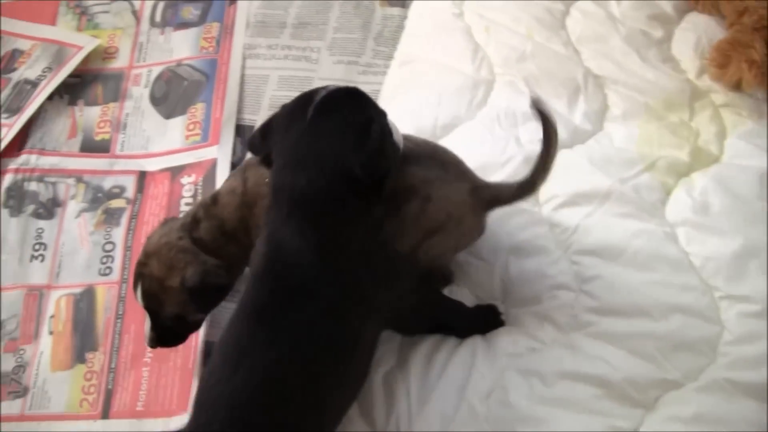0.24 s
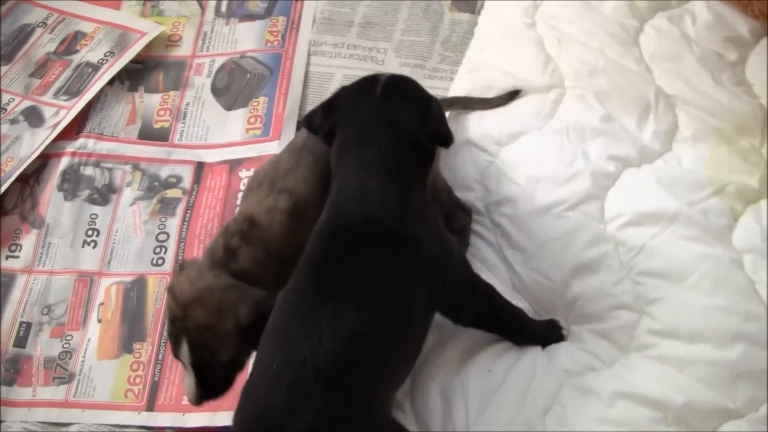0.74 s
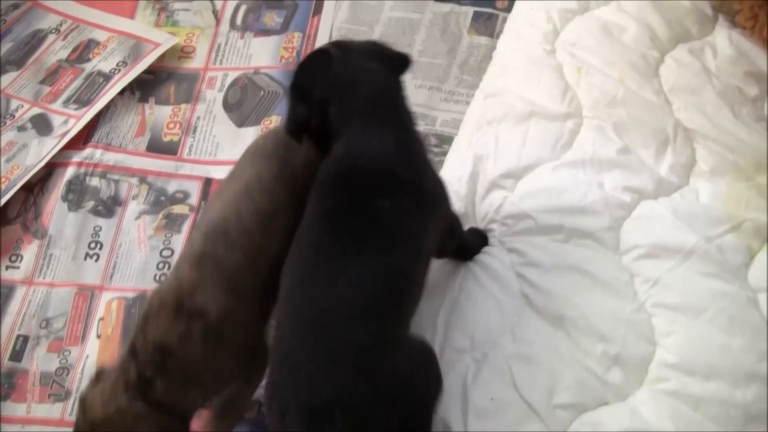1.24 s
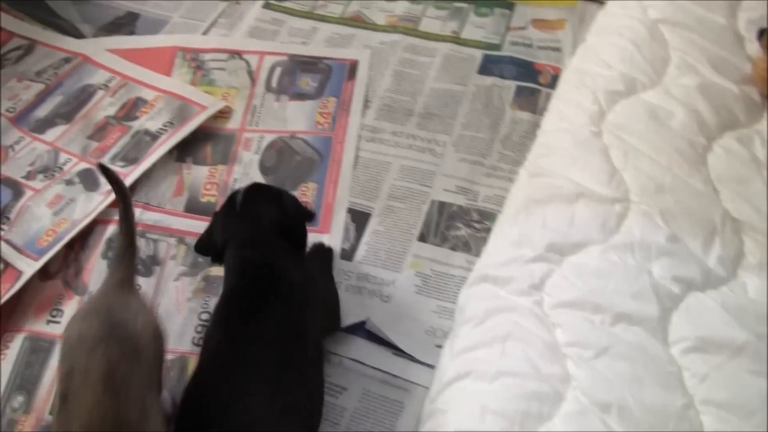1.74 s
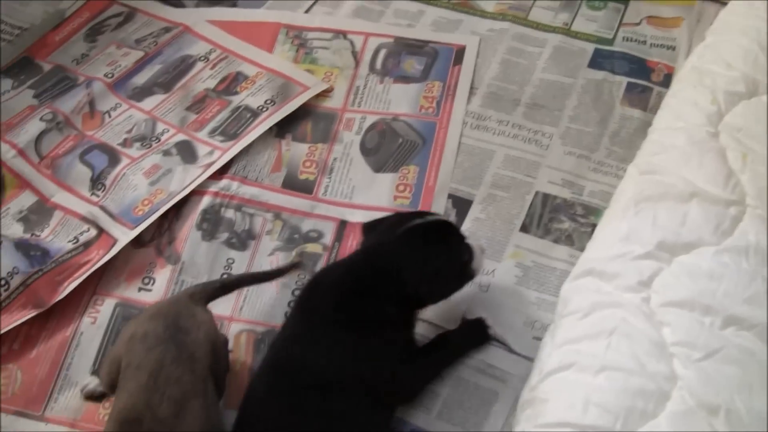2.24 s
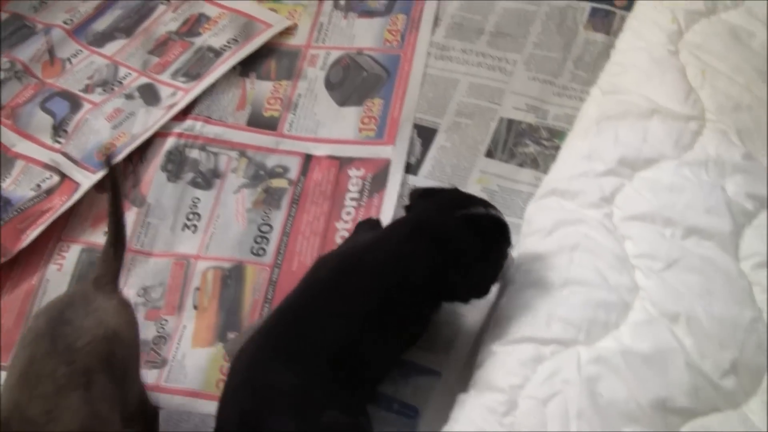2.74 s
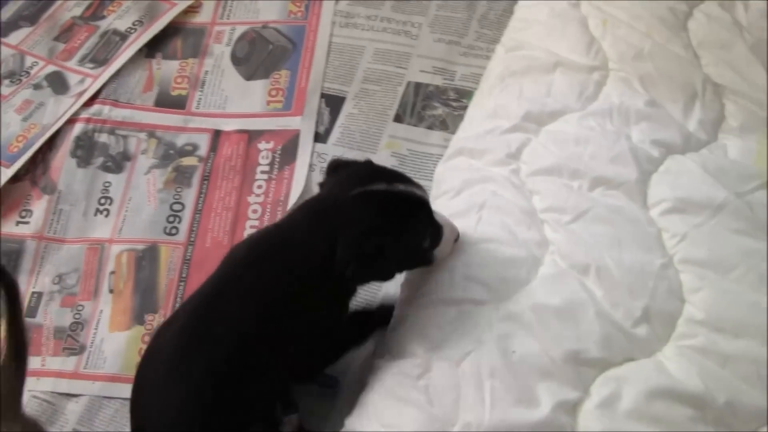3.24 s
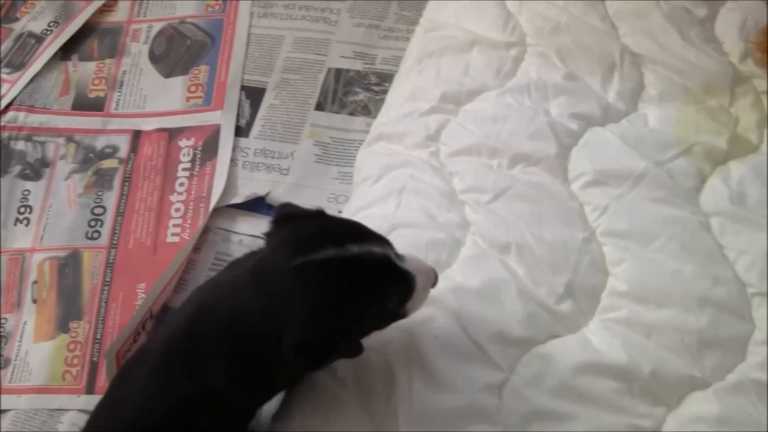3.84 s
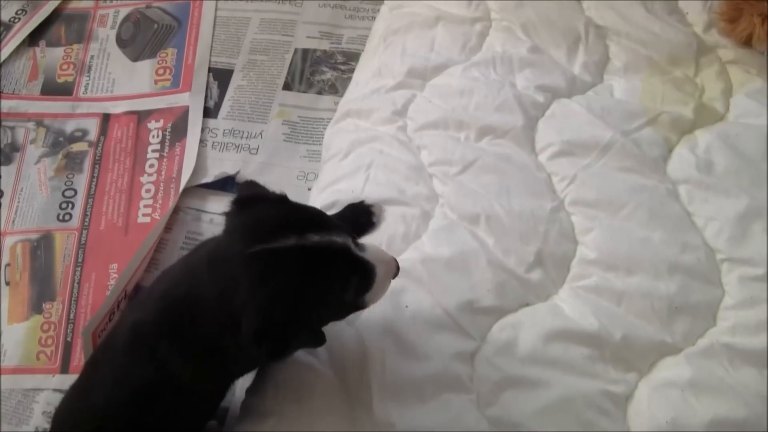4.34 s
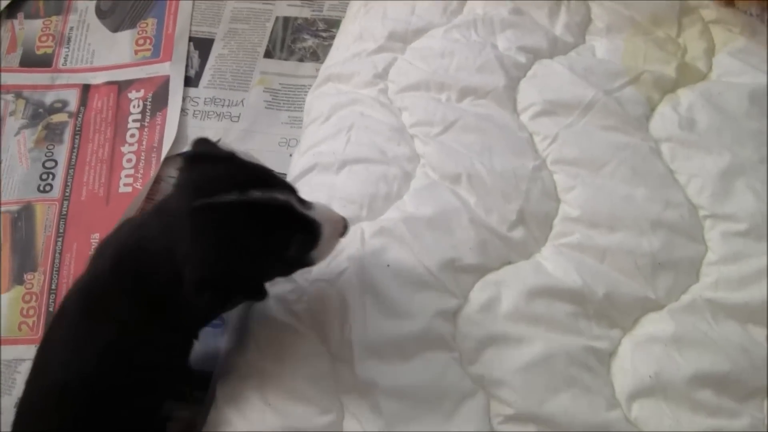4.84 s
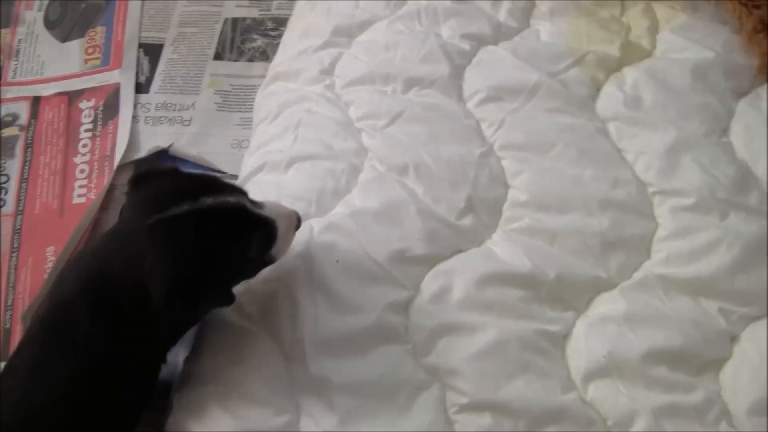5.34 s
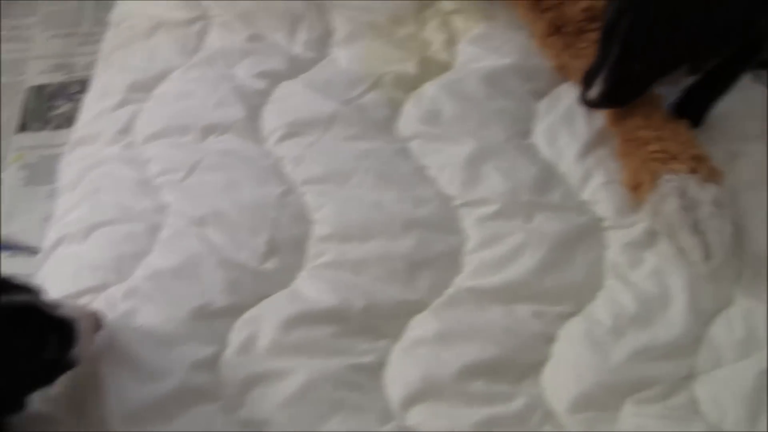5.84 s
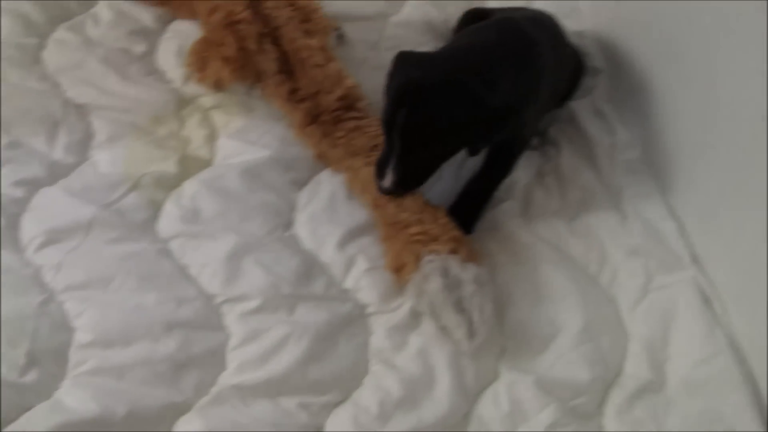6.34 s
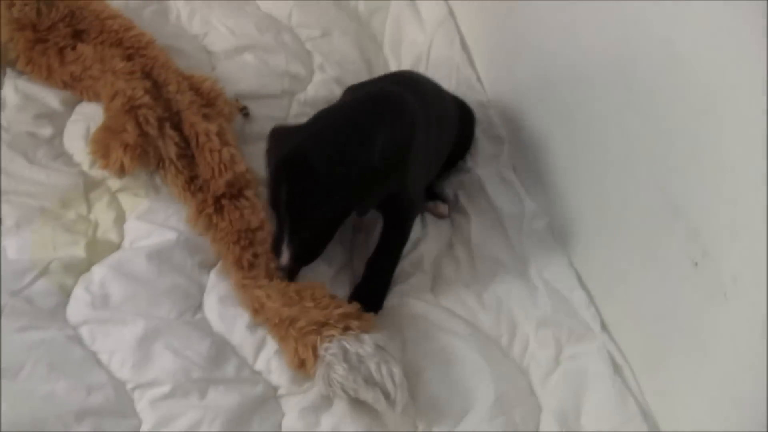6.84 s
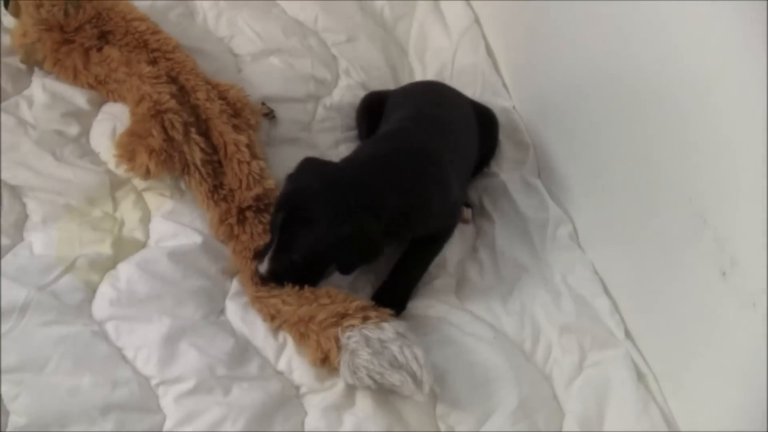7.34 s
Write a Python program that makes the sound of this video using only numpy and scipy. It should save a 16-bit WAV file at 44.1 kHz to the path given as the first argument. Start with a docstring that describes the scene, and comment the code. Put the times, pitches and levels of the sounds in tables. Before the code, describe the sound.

Puppies scuffle on spread newspaper and a duvet in a small room. Paper crinkles and cloth rustles in uneven bursts, with sharp little claw ticks. Early on, the scuffle swells into loud crackling and a cluster of soft thuds on bedding and floorboards, then settles into lighter shuffling, scattered creases and occasional bumps. A microphone about a metre above picks it up with faint hiss.

```python
"""Puppies scuffling on newspaper

Paws drag spread sheets and a duvet (dense crackle), creases buckle in short bursts, claws tick
and bodies thud on bedding and floorboards. Under it lie one faint hum, the short tail of a
small room and the hiss of a microphone pair a metre above."""
import sys
import numpy as np
from scipy import signal
from scipy.fft import rfft, irfft, next_fast_len
from scipy.io import wavfile
from scipy.ndimage import uniform_filter1d

SR = 44100
rng = np.random.default_rng(int(sys.argv[2]) if len(sys.argv) > 2 else 0)


def unload_wav(signal):
    """Save mono or channel-first audio to the path in sys.argv[1] as 16-bit WAV at rate SR, clipped to [-1, 1]."""
    wavfile.write(
        sys.argv[1],
        SR,
        np.round(np.clip(np.atleast_2d(signal).T, -1, 1) * 32767).astype(np.int16),
    )


N = 334719


def undb(db):
    return 10 ** (np.asarray(db) / 20)


def unit(x):
    return x / np.sqrt(np.mean(x ** 2))


def add(out, start_s, sound):
    i = int(start_s * SR)
    out[..., i:i + sound.shape[-1]] += sound[..., :N - i]


def colour(x, points):
    """Shape a spectrum by (frequency [Hz], gain [dB]) points."""
    hz, db = np.transpose(points)
    size = next_fast_len(x.shape[-1])
    bins_hz = np.arange(size // 2 + 1) * SR / size + 1
    gain = undb(np.interp(np.log(bins_hz), np.log(hz), db))
    return irfft(rfft(x, size) * gain, size)[..., :x.shape[-1]]


def noise(count, spectrum):
    """Coloured noise, RMS 1."""
    return unit(colour(rng.standard_normal(count), spectrum))


def ring(x, hz, width_hz):
    """One resonance, gain 1 at its centre."""
    return signal.lfilter(*signal.iirpeak(min(hz, .4 * SR), hz / width_hz, fs=SR), x)


def crackle(count, per_s, spread_db):
    """Random clicks of uneven size."""
    on = rng.random(count) < per_s / SR
    return unit(on * rng.standard_normal(count) * undb(spread_db * rng.exponential(size=count)))


def grains(count, grain_ms, spread_db):
    """Noise broken into grains of uneven size."""
    k = int(grain_ms * SR / 1000) + 1
    size = np.sqrt(k) * uniform_filter1d(rng.standard_normal(count), k)
    return unit(rng.standard_normal(count) * undb(spread_db * size))


def walk(rate_hz):
    """Random steps, smoothed twice; spread near 1."""
    k = int(SR / rate_hz)
    steps = np.repeat(rng.standard_normal(N // k + 1), k)
    return 1.58 * uniform_filter1d(uniform_filter1d(steps, k), k)[:N]


# Microphone noise spectra, mid and side: (frequency [Hz], gain [dB])
MID_HISS_SPECTRUM = [(24, -48), (40, 12.5), (288, 2), (475, 8), (658, 8), (1930, 2.5), (4630, -39),
                     (8640, -31.5), (10300, -23), (12600, -8), (14300, -15), (15800, -70)]
SIDE_HISS_SPECTRUM = [(24, -62), (40, -32), (261, -0.5), (380, 1), (539, -0.5), (804, -3), (1620, -11.5),
                      (4630, -23), (6090, -29), (11100, -32), (13900, -37), (15800, -71)]


def hiss(mid_db=-57.5, side_db=-45.5):
    """Steady noise of the microphone pair: (mid, side)."""
    side = undb(side_db) * noise(N, SIDE_HISS_SPECTRUM)
    mid = undb(mid_db) * noise(N, MID_HISS_SPECTRUM)
    return mid, side


def room(x, low_t60_s=0.1, split_hz=3300):
    """Small room: two unrelated tails, the treble dying first."""
    t = np.arange(int(.5 * SR)) / SR
    white = rng.standard_normal((2, len(t)))
    low = signal.lfilter(*signal.butter(1, split_hz, fs=SR), white)
    decay = -np.log(1000) * t / low_t60_s
    tail = (low * np.exp(decay) + (white - low) * np.exp(1.28 * decay)) * np.minimum(t / 0.0019, 1)
    tail /= np.sqrt(np.sum(tail ** 2, axis=1, keepdims=True))
    return signal.fftconvolve(x[None], tail, axes=1)[:, :N]


# Transfer of near sound to the side channel: (frequency [Hz], gain [dB])
SIDE_RESPONSE = [(100, -41), (500, -43), (2000, -15), (5000, -8), (9000, -4), (12000, 6), (15000, 1)]


def stereo_spread(impacts, wide_drag, decay_s=0.004):
    """Side signal: reflections and spread-out grains reach the two microphones unequally."""
    smear = rng.standard_normal(2048) * np.exp(-np.arange(2048) / SR / decay_s)
    echoes = signal.fftconvolve(impacts, smear / np.sqrt(np.sum(smear ** 2)))[:N]
    return colour(echoes + wide_drag, SIDE_RESPONSE)


def hum(start_s=7.29, end_s=7.39, hz=200, db=-49):
    """One faint, rough swell of a low tone, perhaps a grunt."""
    out, t = np.zeros(N), np.arange(int((end_s - start_s) * SR)) / SR
    rough = 1 + .3 * unit(ring(rng.standard_normal(len(t)), hz=40, width_hz=40))
    swell = np.sin(np.pi * t / (end_s - start_s))
    add(out, start_s, undb(db) * rough * swell * np.sin(2 * np.pi * hz * t))
    return out


# Bedding spectrum: (frequency [Hz], gain [dB])
BEDDING_SPECTRUM = [(35, -10), (60, -19), (96, -10.5), (150, -7), (220, 0.5), (351, 3), (476, -2),
                    (800, -0.5), (1000, -8), (1300, -9), (2200, -120)]
# Bedding movement: (time [s], level [dB])
SHUFFLE_LEVELS = [(0.0, -45.5), (0.4, -50.5), (1.35, -45.5), (1.65, -39), (1.8, -46.5), (2.15, -52),
                  (2.6, -55), (2.9, -51.5), (3.4, -51), (3.85, -49), (4.3, -50), (4.6, -51.5), (4.85, -52),
                  (5.22, -53), (5.67, -48.5), (6.15, -51.5), (6.45, -49.5), (6.75, -52), (6.98, -50),
                  (7.59, -53.5)]


def shuffle():
    """Shifting bedding: dull noise with a wavering level."""
    bedding = noise(N, BEDDING_SPECTRUM)
    level_db = np.interp(np.arange(N) / SR, *np.transpose(SHUFFLE_LEVELS))
    return bedding * undb(level_db + 1.36 * walk(rate_hz=9))


# Paws and bodies landing: (time [s], bedding level [dB], bedding ring [Hz], boards level [dB])
LANDINGS = [(0.118, -34.5, 285, -50), (0.347, -46, 263, -69), (0.653, -35.5, 301, -65),
            (0.919, -38, 343, -55), (1.515, -34, 264, -64), (1.617, -23.5, 292, -38),
            (1.802, -25.5, 275, -29.5), (1.828, -26, 198, -31.5), (1.858, -27, 345, -47),
            (1.958, -32.5, 280, -32.5), (1.99, -41, 327, -37), (2.119, -60, 290, -51),
            (3.36, -41, 207, -58), (3.624, -38, 392, -48), (3.774, -28, 213, -56),
            (3.789, -27.5, 206, -44.5), (4.161, -38, 370, -67), (4.729, -43, 290, -55),
            (4.795, -45, 377, -54), (5.445, -40.5, 390, -64), (5.982, -41, 247, -50),
            (6.538, -35.5, 420, -75), (6.761, -40.5, 245, -72), (6.978, -37, 437, -62),
            (7.004, -33.5, 292, -61)]


def thuds(bedding_t60_s=0.12, boards_hz=97, boards_t60_s=0.13):
    """A soft push rings the bedding, with a dull scatter, and the floorboards under it."""
    out, t = np.zeros(N), np.arange(SR // 4) / SR
    bedding_env = (1 - np.exp(-t / 0.00094)) * np.exp(-np.log(1000) * t / bedding_t60_s)
    boards_env = (1 - np.exp(-t / 0.0031)) * np.exp(-np.log(1000) * t / boards_t60_s)
    for time_s, bedding_db, hz, boards_db in LANDINGS:
        scatter = noise(len(t), BEDDING_SPECTRUM)
        rumble = unit(ring(ring(rng.standard_normal(len(t)), boards_hz, 45), boards_hz, 45))
        bedding = bedding_env * (0.95 * np.sin(2 * np.pi * hz * t) + 0.67 * scatter)
        boards = boards_env * (2.2 * np.sin(2 * np.pi * boards_hz * t) + 1.66 * rumble)
        add(out, time_s, undb(bedding_db) * bedding + undb(boards_db) * boards)
    return out


# Fibre crackle spectrum: (frequency [Hz], gain [dB])
FIBRE_SPECTRUM = [(2000, -4.5), (3500, 2.5), (5000, 1.5), (9000, 0), (11000, -5), (12600, -12.5),
                  (14400, -22), (15800, -52)]


def fibres(count, spread_db, split_hz=7000):
    """Fibres crackle independently in two bands: rows (coarse, fine)."""
    lowpass, highpass = signal.butter(2, split_hz, fs=SR), signal.butter(2, split_hz, "high", fs=SR)
    coarse = signal.lfilter(*lowpass, grains(count, grain_ms=2.0, spread_db=spread_db))
    fine = signal.lfilter(*highpass, grains(count, grain_ms=0.35, spread_db=spread_db))
    return colour(np.array([coarse, fine]), FIBRE_SPECTRUM)


# Rustle between slides: (body [dB], coarse [dB], fine [dB])
RESTING_DB = (-55, -61.5, -62.5)
# Paper and cloth slides:
# (peak time [s], body [dB], coarse [dB], fine [dB], swell [s/10 dB], fade [s/10 dB])
SLIDES = [(0.02, -47, -54, -52, 0.089, 0.42), (0.28, -44, -44, -40.5, 0.032, 0.06),
          (0.35, -35.5, -40.5, -57, 0.06, 0.027), (0.48, -45, -59, -61, 0.03, 0.12),
          (0.62, -42.5, -47, -51, 0.12, 0.076), (0.685, -41, -47, -49, 0.053, 0.018),
          (0.81, -47.5, -53, -56, 0.061, 0.088), (0.903, -37, -43, -44, 0.016, 0.044),
          (0.96, -43.5, -42.5, -44.5, 0.044, 0.16), (1.117, -29, -27, -42, 0.017, 0.017),
          (1.14, -38.5, -41, -46.5, 0.03, 0.06), (1.3, -41, -41.5, -40.5, 0.032, 0.051),
          (1.4, -41.5, -43, -47.5, 0.054, 0.11), (1.462, -38, -30.5, -39, 0.0054, 0.05),
          (1.485, -36, -30.5, -24.5, 0.022, 0.033), (1.519, -28, -26, -36, 0.028, 0.025),
          (1.565, -31, -29.5, -37, 0.03, 0.022), (1.625, -30.5, -36.5, -35, 0.012, 0.17),
          (1.83, -36, -42, -31.5, 0.028, 0.05), (1.875, -40, -44, -38.5, 0.05, 0.02),
          (1.99, -37, -39, -37.5, 0.14, 0.087), (2.5, -50.5, -51.5, -49, 0.41, 0.63),
          (2.76, -45, -43, -62, 0.057, 0.2), (2.85, -48, -48, -44.5, 0.27, 0.13),
          (3.276, -43, -43, -34.5, 0.12, 0.049), (3.32, -38, -43, -38.5, 0.071, 0.036),
          (3.39, -37, -38, -45, 0.025, 0.079), (3.62, -46.5, -46, -41.5, 0.21, 0.049),
          (3.78, -37.5, -42.5, -39, 0.06, 0.21), (3.85, -41, -57, -52, 0.046, 0.03),
          (4.19, -43, -63, -55, 0.068, 0.053), (4.38, -54.5, -51.5, -56, 0.074, 0.11),
          (4.52, -52, -50, -52, 0.14, 0.037), (4.7, -47, -52, -57, 0.073, 0.05),
          (4.81, -53, -53, -50, 0.042, 0.1), (4.9, -48, -50, -50, 0.05, 0.14),
          (5.1, -52, -50, -54.5, 0.048, 0.11), (5.26, -47, -52, -52, 0.057, 0.021),
          (5.42, -43.5, -57, -53, 0.047, 0.046), (5.45, -42.5, -48, -51, 0.04, 0.081),
          (5.56, -43, -60, -58, 0.036, 0.06), (5.645, -46, -48, -47, 0.09, 0.02),
          (5.86, -41.5, -47.5, -51, 0.16, 0.1), (6.03, -46, -50, -45.5, 0.11, 0.037),
          (6.18, -52.5, -56, -56.5, .15, 0.24), (6.34, -44.5, -48, -48, 0.03, 0.17),
          (6.48, -43, -56, -49, 0.016, 0.19), (6.668, -40, -39.5, -44, 0.0064, 0.051),
          (6.8, -33, -40, -46, 0.031, 0.043), (6.965, -46, -45, -47.5, 0.05, 0.046),
          (7.01, -45, -44.5, -45.5, 0.03, 0.024), (7.15, -39.5, -50, -51, 0.081, 0.046),
          (7.31, -49.5, -55, -51, 0.064, 0.19), (7.52, -39.5, -40, -38, 0.012, 0.05)]


def slide_gains():
    """Slides swell and fade over the resting rustle: gains (body, coarse, fine)."""
    t = np.arange(0, N / SR, .002)
    power = undb(RESTING_DB)[:, None] ** 2
    for peak_s, *peak_db, swell_s, fade_s in SLIDES:
        decades = np.where(t < peak_s, (peak_s - t) / swell_s, (t - peak_s) / fade_s)
        power = power + undb(peak_db)[:, None] ** 2 * 10 ** -decades
    return [np.interp(np.arange(N) / SR, t, row) for row in np.sqrt(power)]


# Midrange body of the rustle: (frequency [Hz], gain [dB])
RUSTLE_SPECTRUM = [(250, -22), (500, -4), (800, -1), (1600, 3), (2600, 1), (4000, -10), (6000, -40),
                   (11000, -70)]


def drag(jerk, gains):
    """Sheets and cloth slip in tiny grains; body and fibres share the jerks of the pull."""
    body_gain, coarse_gain, fine_gain = gains
    body = unit(colour(crackle(N, per_s=6000, spread_db=0.3), RUSTLE_SPECTRUM)) * undb(1.3 * jerk)
    coarse, fine = fibres(N, spread_db=1.5) * undb(1.72 * jerk)
    return body * body_gain + unit(coarse) * coarse_gain + unit(fine) * fine_gain


# Claws and stiff folds: (time [s], level [dB], ring [Hz])
CLAW_TICKS = [(0.3504, -15, 5800), (0.678, -27, 4240), (0.9024, -27, 4040), (1.089, -15, 4330),
              (1.392, -24, 3820), (1.703, -10, 9390), (1.9689, -22, 9020), (2.013, -21, 6380),
              (2.4942, -24, 5730), (2.646, -37, 5500), (2.707, -21, 8500), (2.7285, -21, 8800),
              (2.74, -18, 8200), (2.747, -24, 8600), (2.7615, -20, 8800), (2.814, -27, 5500),
              (2.817, -22, 6800), (2.882, -35, 5500), (2.906, -23, 7500), (2.954, -27, 5500),
              (2.977, -26, 4730), (3.6122, -21, 8160), (3.7808, -21, 6930), (4.9234, -28, 3900),
              (4.9745, -31, 5000), (5.2725, -29, 4980), (5.448, -21, 5860), (5.9274, -29, 6580),
              (6.4708, -16, 5260), (6.5906, -17.5, 6350), (6.665, -21, 6620), (7.001, -29, 7180),
              (7.511, -25, 6240)]


def ticks():
    """A claw or stiff fold clicks for a few cycles, with a short fuzz behind it."""
    out, t = np.zeros(N), np.arange(SR // 100) / SR
    fuzz_env = np.minimum(t / 0.0009, 1) * np.exp(-t / 0.0057)
    for time_s, db, hz in CLAW_TICKS:
        click = np.sin(2 * np.pi * hz * t) * np.minimum(t * hz, 1) * np.exp(-t * hz / 2.7)
        fuzz = 0.48 * ring(rng.standard_normal(len(t)), hz, 0.25 * hz) * fuzz_env
        add(out, time_s, undb(db) * (click + fuzz))
    return out


def faint_creases(count=10, min_db=-44, min_hz=1200, octaves=1.4, tear_db=-5, burst_ms=8.3, scuff_db=-7):
    """Small creases at random times, as rows like those of CREASES."""
    return [(0.0081 + when * (N / SR - .1), min_db + 4 * size, min_hz * 2 ** (octaves * pitch),
             tear_db, burst_ms, scuff_db) for when, size, pitch in rng.random((count, 3))]


# Creases buckling under a paw:
# (time [s], relative level [dB], ring [Hz], tear [dB re ring], burst [ms], scuff [dB re ring])
CREASES = [(0.005, -29, 1150, -18, 6.9, -14), (0.032, -31, 1080, -18, 8.7, -15),
           (0.113, -36, 2930, -7, 8, -6), (0.264, -35, 1240, -4, 25, -13),
           (0.286, -28, 2620, -16, 22, -1.5), (0.319, -27.5, 2800, -3, 14, -6),
           (0.347, -27, 1070, 3, 6.2, 3), (0.455, -41, 2000, -8, 10, -1),
           (0.524, -24.5, 1200, -36, 23, -11), (0.568, -38, 4700, -1, 24, -18),
           (0.649, -32.5, 800, -11, 11, -10), (0.794, -44, 2620, -5, 46, 2), (0.88, -32, 1500, -10, 2.7, 0),
           (0.9, -26, 4100, 3.5, 9.8, 1), (0.997, -33.5, 1950, -13, 11, -20),
           (1.03, -35.5, 988, 3.5, 13, 0), (1.048, -29.5, 3300, -3, 8, -10),
           (1.089, -28.5, 3070, -22, 11, 1), (1.109, -27, 2193, 4, 10, 1.5),
           (1.118, -23.5, 2180, 0, 6.2, 0), (1.3, -26, 2050, 1.5, 10.4, 2),
           (1.372, -32, 3400, -15, 20, -13), (1.395, -29.5, 1000, -2, 9.3, -2),
           (1.456, -25.5, 1950, -7, 9.8, 6), (1.468, -23.5, 725, -19, 25, -13),
           (1.476, -30, 4700, 4, 16, -10), (1.5, -16, 1800, 1, 9, -7),
           (1.516, -12.5, 2340, -0.5, 10.5, -0.5), (1.5175, -18.5, 764, -30, 9, -20),
           (1.552, -25, 760, -20, 15, -15), (1.562, -24, 1810, 0, 12, 6), (1.6032, -11.5, 3250, 6, 11, 2.5),
           (1.679, -27, 786, 3, 11.4, -11), (1.704, -23, 2150, 3, 10.5, -5),
           (1.713, -24.5, 825, 2.5, 5.6, -2), (1.797, -26, 2200, -16, 9.8, -15),
           (1.823, -21.5, 1430, -1.5, 9, -6), (1.835, -28, 1500, 0.5, 20, -2),
           (1.852, -22.5, 1460, -1, 10.3, 5.5), (1.88, -24, 2520, -16, 5.4, -7),
           (1.96, -26, 1070, 2, 10, 5), (1.969, -28, 870, 4.5, 18.4, 6), (2.012, -32, 1700, -3, 6, 4),
           (2.03, -37, 850, -15, 8.3, 3), (2.079, -34, 2220, -12, 11, 0), (2.136, -33, 1820, 3, 14, 2),
           (2.166, -35, 2600, 7, 8.7, -2), (2.495, -42, 4100, 10, 7.7, -21),
           (2.622, -30.5, 1570, -19, 5, -2), (2.651, -35, 1690, -16, 7, -1),
           (2.761, -29.5, 890, 1.5, 7.5, 0.5), (2.791, -25.5, 2600, -20, 9, -14),
           (2.814, -38, 1350, 7, 9.1, 4), (2.839, -32.5, 2430, -15, 11, -4), (2.977, -37, 1940, 4.5, 18, 6),
           (3.083, -32, 1540, -13, 12, -10), (3.321, -35, 1800, -12, 13, 2),
           (3.379, -26, 2870, -25, 14, -7), (3.382, -27, 1590, -25, 23, -2),
           (3.405, -27, 2400, -2, 12.6, 3), (3.534, -32, 3180, -8, 6, -18),
           (3.546, -33, 3000, -1, 7.9, -12), (3.614, -33.5, 2780, 0, 8.1, 3),
           (3.623, -28, 2340, -18, 7.7, 4.5), (3.76, -30, 800, -20, 12, -13),
           (3.773, -16, 1200, -11, 13, -4.5), (3.887, -34, 2160, -25, 6.4, -1),
           (3.968, -26.5, 2080, -21, 6.8, -9), (4.018, -27, 1056, -28, 4.2, -2),
           (4.087, -36.5, 1080, -14, 44, -7), (4.164, -20.5, 1200, -8.5, 13.8, 1),
           (4.542, -37, 1600, -11, 8, -4), (4.731, -30.5, 1920, -3.5, 9.1, -2.5),
           (4.745, -38, 2700, 1.5, 9.1, 0), (4.79, -38.5, 2300, -8, 16, 0),
           (4.874, -28, 1090, -10, 9.1, -20), (4.903, -34.5, 1780, -21, 12, -6),
           (5.101, -30.5, 1150, -2, 5.7, -1), (5.205, -34, 1800, -20, 4, -8),
           (5.225, -29, 1790, -8, 10, -10), (5.389, -38, 2400, -2, 5, -3),
           (5.445, -26.5, 1470, -10, 11, -1.5), (5.539, -34, 1840, -4, 8, 2.5),
           (5.638, -43.5, 1420, 10.5, 7.7, -11), (5.686, -31.5, 597, -18, 10, -14),
           (5.731, -39, 3100, -1.5, 20, -6), (5.76, -37, 2000, -5, 12, 0),
           (5.798, -36.5, 560, -25, 12, -20), (5.818, -32, 1500, -12, 16, -10),
           (5.838, -30.5, 1820, -21, 13, -16), (5.864, -32, 1520, -16, 12, -19),
           (5.905, -38, 1850, -20, 7, -15), (5.927, -26.5, 1100, -9, 7, -5),
           (5.94, -33, 1200, -25, 7.2, -20), (5.988, -32.5, 530, -12, 10, 0.5),
           (5.997, -34.5, 1800, -7, 9.9, -6), (6.274, -36, 1060, -10, 8.6, 1), (6.33, -36, 2150, 0, 12, 0),
           (6.388, -39, 1960, 6, 19, -8), (6.471, -22, 2970, 3, 5, -1.5), (6.485, -33.5, 2600, 2.5, 12, -7),
           (6.535, -36, 1440, -5, 31, 3.5), (6.589, -26, 2440, -14, 10.6, -7),
           (6.663, -28.5, 1410, 1, 12.6, 2.5), (6.765, -36, 1700, -11, 10, 0),
           (6.775, -29.5, 1750, -4, 17, 1.5), (6.798, -36, 1520, -27, 11, -8),
           (6.981, -20.5, 1070, -18, 19, -7), (6.996, -22.5, 1200, -10.5, 18, -15),
           (7.005, -31.5, 448, -22, 14, 4.5), (7.028, -33, 1150, -25, 43, -8),
           (7.113, -38, 1700, -3, 23, -13), (7.139, -26, 3400, 3.5, 6, 2), (7.465, -42, 1570, 2.5, 32, -3)]


def creases():
    """A crease gives way in one snap and a ragged run of others, ringing the hollow under the sheet."""
    out, t = np.zeros(N), np.arange(6144) / SR
    t_ms = 1000 * t
    rise = np.minimum(t / 0.002366, 1)
    settling = 0.21 * rise * np.exp(-t / 0.067)
    for time_s, db, hz, tear_db, burst_ms, scuff_db in CREASES + faint_creases():
        burst = rise * (np.exp(-(t_ms / burst_ms) ** 2) + 0.26 * np.exp(-t / 0.028))
        main_snap = 39.0 / burst_ms * (np.arange(len(t)) == np.argmax(burst))
        snaps = (main_snap + crackle(len(t), per_s=1500, spread_db=-1.5)) * (burst + settling)
        hollow = ring(ring(snaps, hz, .38 * hz), hz, .7 * hz)
        scuff = colour(grains(len(t), grain_ms=1.3, spread_db=5.5) * burst, RUSTLE_SPECTRUM)
        tear_onset = np.minimum(t_ms / (0.37 * burst_ms), 1)  # fibres tear a moment late
        tear = fibres(len(t), spread_db=2.5).sum(axis=0) * burst * tear_onset
        sound = unit(hollow) + undb(scuff_db) * unit(scuff) + undb(tear_db) * unit(tear)
        gain = 0.43 * np.sqrt(np.mean(burst ** 2)) * undb(db)
        add(out, time_s - .001, gain * sound)
    return out


def scene(room_db=-11):
    """Mix mid, side and room tail to (left, right)."""
    bodies = thuds() + hum()
    jerk, gains = walk(rate_hz=30), slide_gains()
    hits = creases() + ticks()
    near = hits + drag(jerk, gains) + shuffle()
    wide_drag = drag(jerk, gains) + shuffle()  # same pull, other grains
    side = stereo_spread(hits + bodies, wide_drag)
    mid_hiss, side_hiss = hiss()
    mid = near + bodies + mid_hiss
    return mid + (side + side_hiss) * np.array([[1], [-1]]) + undb(room_db) * room(near)


def record(dry, bass_hz=78, top_hz=15850):
    """The microphone drops the deep bass; the recorder rounds the peaks and cuts the top."""
    thin = signal.sosfilt(signal.butter(4, bass_hz, "high", fs=SR, output="sos"), dry)
    return signal.sosfilt(signal.ellip(10, .2, 80, top_hz, fs=SR, output="sos"), np.tanh(thin))


dry = scene()
out = record(dry)
unload_wav(out)
```